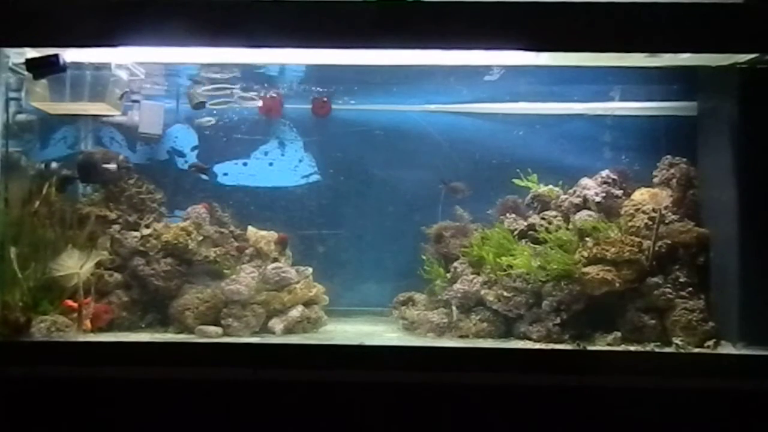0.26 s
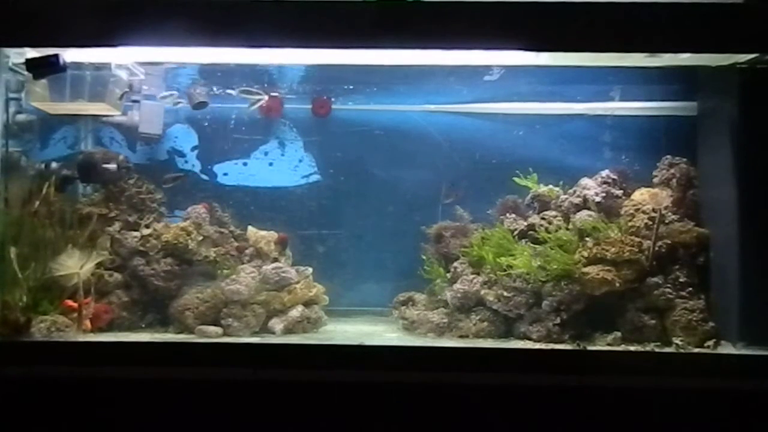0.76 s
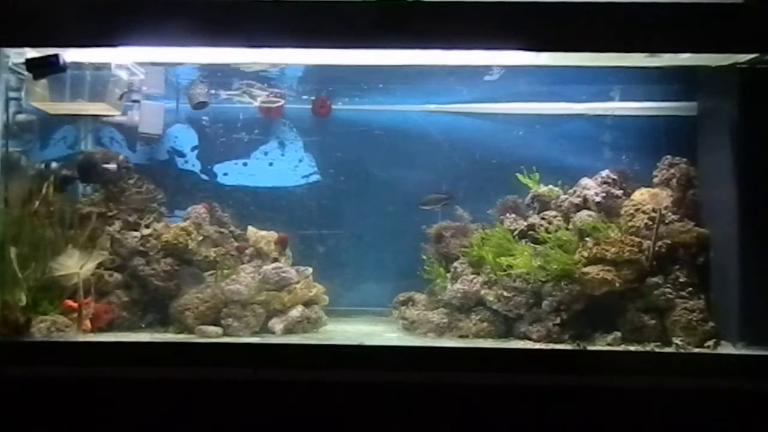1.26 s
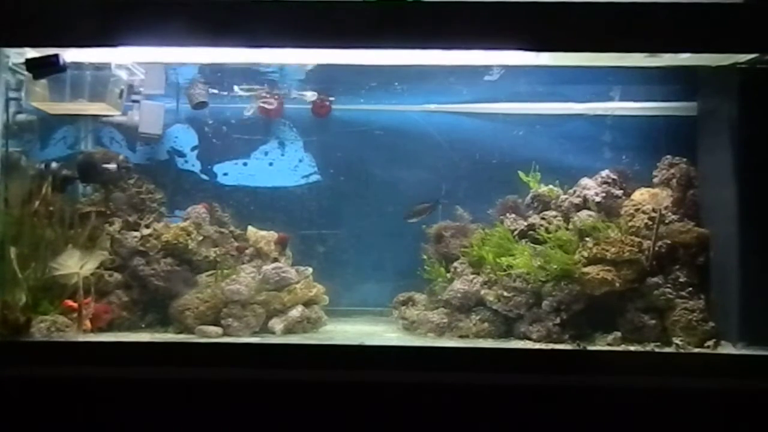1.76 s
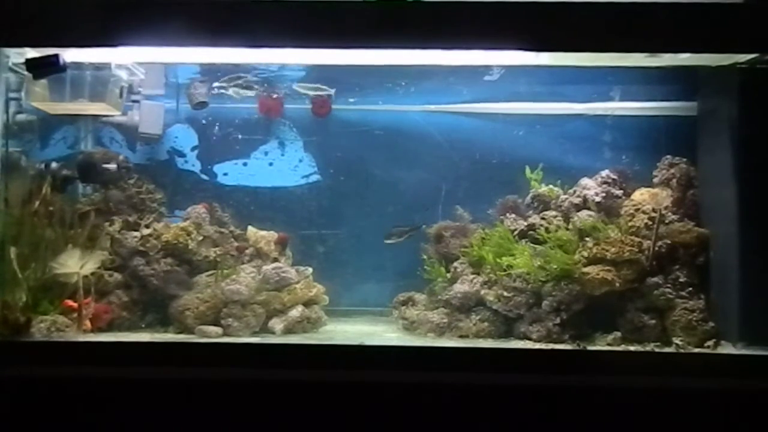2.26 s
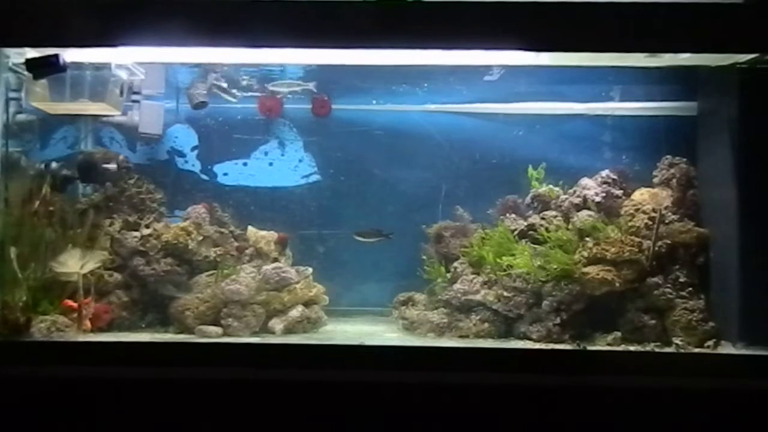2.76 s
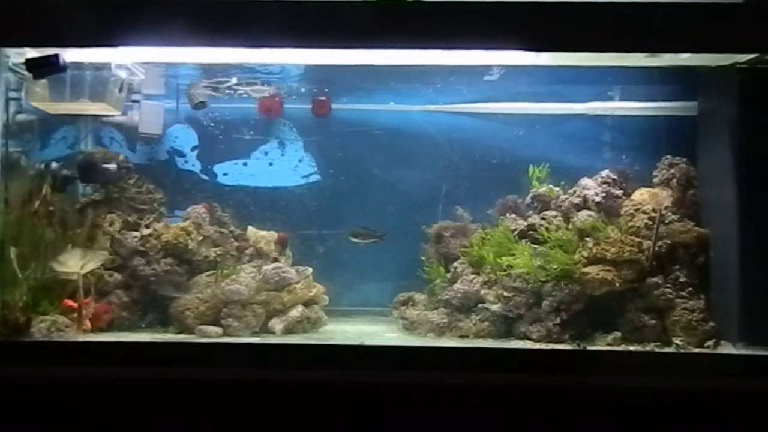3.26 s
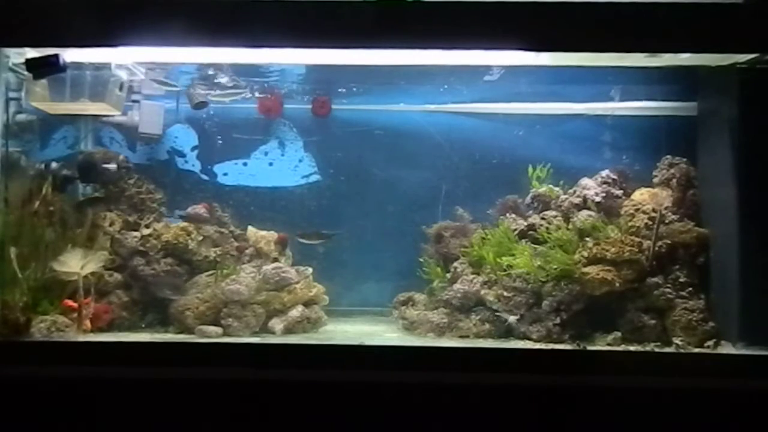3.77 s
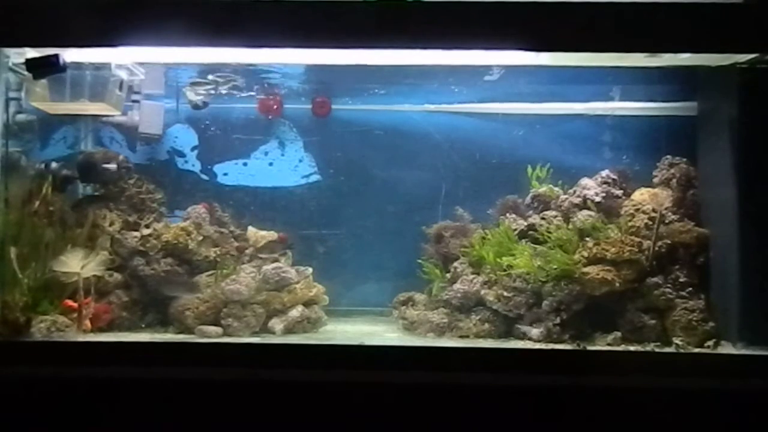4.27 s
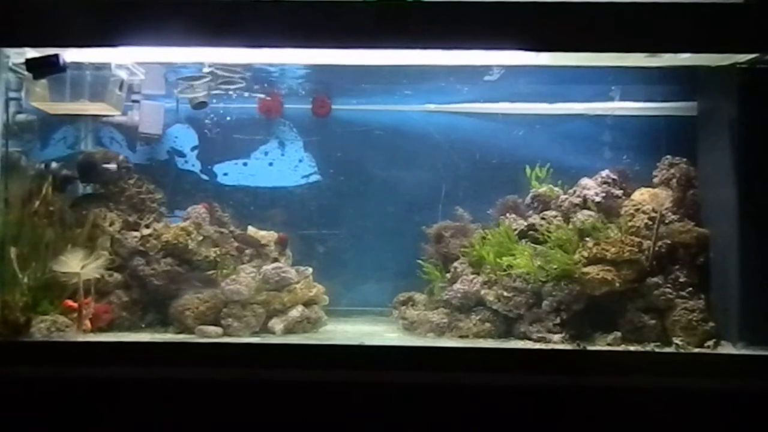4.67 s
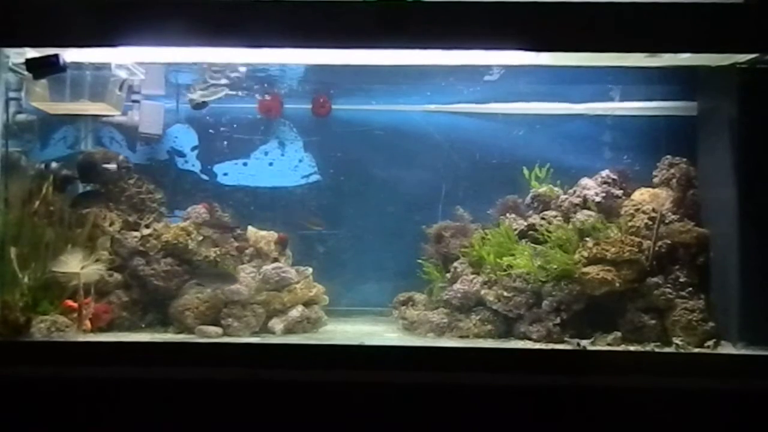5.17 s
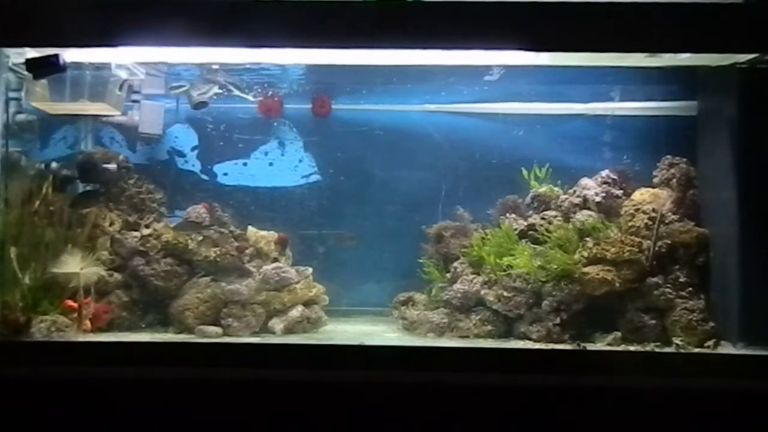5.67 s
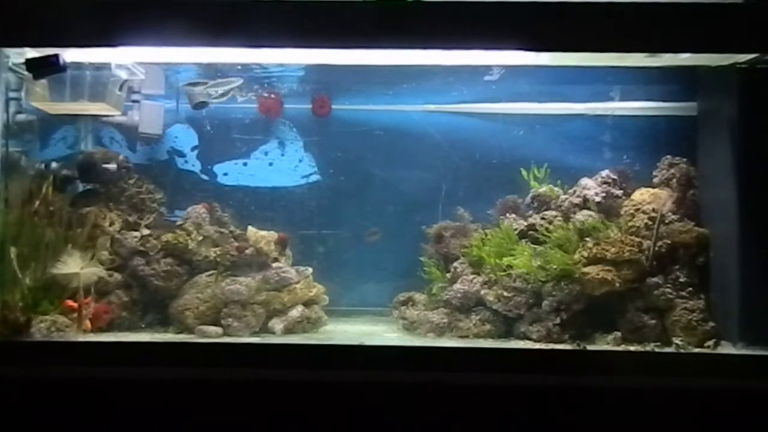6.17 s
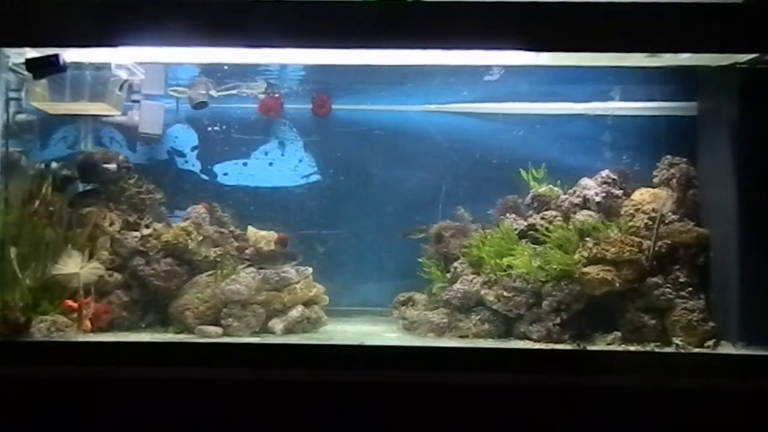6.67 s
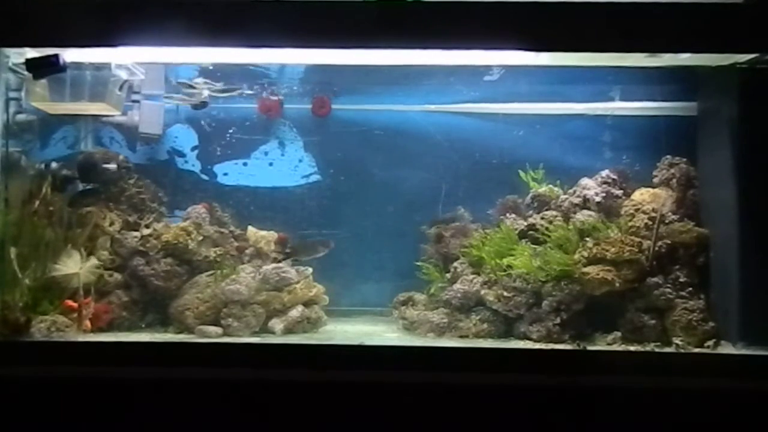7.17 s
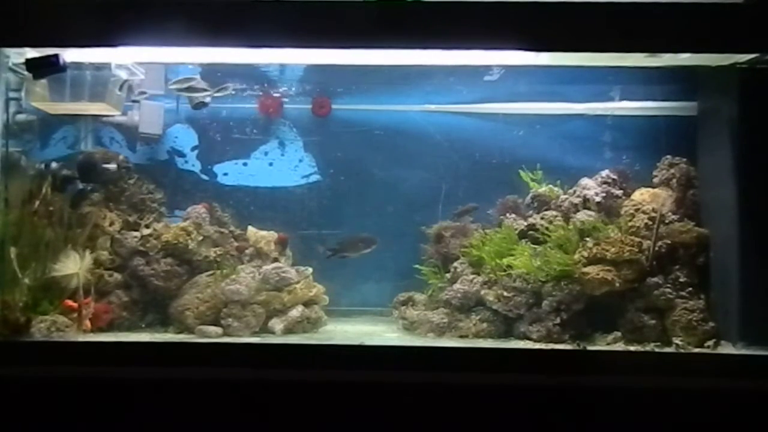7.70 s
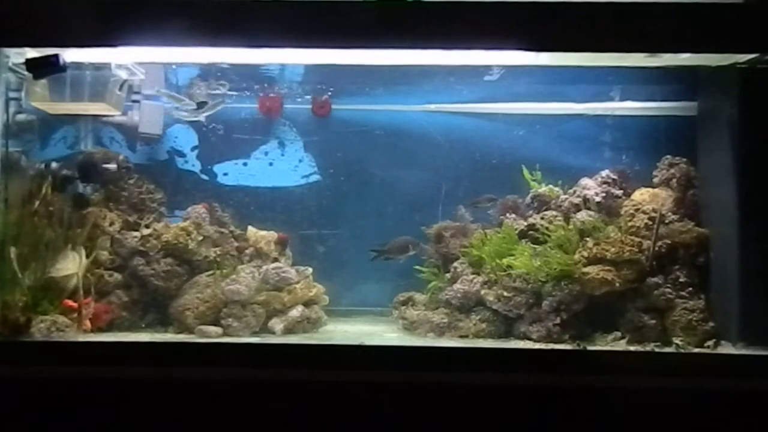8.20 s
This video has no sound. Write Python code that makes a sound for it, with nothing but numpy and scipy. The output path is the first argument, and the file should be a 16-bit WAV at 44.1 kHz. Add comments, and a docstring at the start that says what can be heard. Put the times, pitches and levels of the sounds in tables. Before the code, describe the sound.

A constant deep electrical drone dominates, with a quiet metallic purr from the spinning impeller and gentle hiss of outlet water. Its upper hum thickens after the first couple of seconds. Small bright clicks and brief squeaky scrapes appear irregularly. After almost seven seconds a rougher, mid-pitched grinding begins with a momentary howl and pulses until the end. Indoor stereo pickup, low sound slightly stronger on the left, little obvious echo.

```python
"""A mains-driven aquarium pump hums through glass and cabinet in a quiet room, low tones leaning left.
Its impeller ticks unevenly through each turn and rings the housing; now and then it knocks or scrapes.
Coloured noise makes the rush of water at the outlet, and many short pings make its fizz.
Near the end the impeller catches with a brief howl and goes on rasping with a faint whine.
The microphones hear each noise source as direct sound plus a diffuse part that differs left and right."""
import sys
import numpy as np
from scipy import signal
from scipy.fft import rfft, irfft
from scipy.io import wavfile

SR = 44100
rng = np.random.default_rng(int(sys.argv[2]) if len(sys.argv) > 2 else 0)


def put_to_file(sound):
    """Save the sound as 16-bit audio at rate SR, in the file named by the first command-line argument."""
    columns = np.atleast_2d(sound).T  # one column per channel
    safe = np.clip(columns, -1, 1)
    whole_steps = np.round(safe * 32767)
    wavfile.write(sys.argv[1], SR, whole_steps.astype(np.int16))


N = 372204
TIME = np.arange(N) / SR  # s
FREQS = np.arange(N // 2 + 1) * SR / N + 1e-6  # Hz, kept above zero for the logarithms
MAINS_HZ = 50


def amp(db):
    """Decibels to gain."""
    return 10 ** (np.asarray(db) / 20)


def curve(rows):
    """Gain over time from (s, dB) points."""
    return amp(np.interp(TIME, *np.transpose(rows)))


def colour(points, hz=FREQS):
    """Gain over frequency from (Hz, dB) points, joined on a logarithmic frequency scale."""
    point_hz, db = np.transpose(points)
    return amp(np.interp(np.log(hz), np.log(point_hz), db))


def unit(x):
    """Scale to rms 1."""
    return x / np.sqrt(np.mean(x ** 2))


def walk(rate_hz):
    """Smooth random wandering with spread 1: noise with its fast part filtered off."""
    slowing = (1 + (FREQS / rate_hz) ** 2) ** 2
    return unit(irfft(rfft(rng.standard_normal(N)) / slowing, N))


def bump(peak_s, half_s):
    """A smooth swell from 0 to 1 and back."""
    return np.exp(-((TIME - peak_s) / half_s) ** 2)


def swells(rows):
    """Gain over time that rises or dips briefly for each (peak s, half length s, rise dB)."""
    return amp(sum(db * bump(at, half) for at, half, db in rows))


def settle(start_s, rise_s):
    """Rise from 0 towards 1, quickly at first and then ever more slowly."""
    return 1 - np.exp(-np.maximum(TIME - start_s, 0) / rise_s)


def resonance(hz, width_hz):
    """Response of one damped mode, gain 1 at its centre."""
    return 1 / (1 + 1j * (FREQS / hz - hz / FREQS) * hz / width_hz)


def modes(rows):
    """Several resonances together, each made steeper by a second one of twice the width."""
    return sum(amp(db) * resonance(hz, width) * np.abs(resonance(hz, 2 * width)) for hz, width, db in rows)


def tone(cycles, waver=0, waver_hz=5.1):
    """A sine of rms 1 whose size and phase waver at random."""
    wander = 1 + waver * (walk(waver_hz) + 1j * walk(waver_hz))
    wander = wander / np.sqrt(1 + 2 * waver ** 2)
    return np.sqrt(2) * np.real(wander * np.exp(2j * np.pi * cycles))


def rotor_tone(hz, turns, waver, waver_hz):
    """A wavering tone on the multiple of half the rotor rate nearest to hz, from a random phase."""
    cycles_per_turn = round(2 * hz / MAINS_HZ) / 2
    return tone(cycles_per_turn * turns + rng.random(), waver, waver_hz)


# Diffuse room sound against direct sound at the microphones.
# Each row: frequency in Hz, level in dB.
DIFFUSE_ROOM = [(40, -20.5), (130, -15.5), (260, -3), (500, -5), (1000, -11), (2000, -6.5), (4000, -5),
                (8000, -4.5), (12000, -0.5)]


def radiate(pair, response):
    """Colour direct and diffuse noise (response in gain per root Hz); the diffuse part is opposite left and right."""
    direct, diffuse = rfft(pair) * response * np.sqrt(SR / 2)
    diffuse = diffuse * colour(DIFFUSE_ROOM)
    return irfft(np.array([direct + diffuse, direct - diffuse]), N)


def reflections(near_s=.002, far_s=.024, echo_db=-13, count=9):
    """Echoes from glass and walls comb the sound into narrow peaks and dips; mean power gain 1."""
    lags = near_s + (far_s - near_s) * (np.arange(count) + rng.random(count)) / count
    echoes = np.zeros(N)
    echoes[0] = 1
    echoes[np.maximum(lags * SR, 1).astype(int)] = amp(echo_db) * rng.choice([-1, 1], count)
    return rfft(echoes) / np.sqrt(np.sum(echoes ** 2))


# Moving water at the outlet, before it flickers.
# Each row: frequency in Hz, level in dB per Hz.
WATER_COLOUR = [(25, -99), (62, -77.5), (112, -72), (133, -68.5), (145, -73.5), (180, -73), (250, -76.5),
                (310, -80), (680, -80.5), (950, -80.5), (1200, -80), (2300, -86), (4400, -94), (7800, -100),
                (10500, -100), (14000, -109), (15700, -109.5)]


def water(flicker_db=0.4):
    """The outflow rushes softly as coloured noise; every octave flickers on its own."""
    count = 9
    octaves = np.clip(np.log2(FREQS / MAINS_HZ), 0, count - 1)
    flow = rfft(radiate(rng.standard_normal((2, N)), colour(WATER_COLOUR) * reflections(echo_db=-17)))
    out = np.zeros((2, N))
    for k in range(count):
        band = irfft(flow * np.maximum(1 - np.abs(octaves - k), 0), N)
        out += band * amp(flicker_db * walk(8.4))
    return out


# Swells and dips shared by the fizz and the spray of the ticks.
# Each row: peak in seconds, half length in seconds, rise in dB before the whole is scaled to rms 1.
FLOW_SWELLS = [(.3, 0.5, 1), (1.45, 0.17, -1), (1.9, 0.3, 1), (2.5, .1, 1), (3.2, 0.15, 2.5),
               (3.38, 0.081, -1), (3.65, 0.12, 1), (4.35, 0.26, -2), (5.02, 0.2, 1.6), (5.55, 0.1, 1),
               (6.4, 0.15, 2), (6.92, .06, 2.5), (7.22, 0.07, 3.5), (7.52, 0.07, 3.5), (8.1, 0.2, 3.5),
               (8.38, 0.049, 3.5)]
FLOW_WANDER_DB, FLOW_WANDER_HZ = 1.16, 8


def flow_strength():
    """Gain of rms 1 that swells and dips at set moments and wanders at random."""
    return unit(swells(FLOW_SWELLS) * amp(FLOW_WANDER_DB * walk(FLOW_WANDER_HZ)))


def fizz(rate=130, cycles=4.7, fizz_db=-66.5, low_hz=4500, high_hz=12500):
    """Tiny bubbles burst at the surface (rate per second), each a short ping; higher ones are weaker."""
    out = np.zeros((2, N + 256))
    t = np.arange(256) / SR
    # the two sides of each ping start at their own random phases
    for when, pitch, size, left, right in rng.random((int(rate * N / SR), 5)):
        hz = low_hz + (high_hz - low_hz) * pitch
        decay = np.exp(-t * hz / cycles)
        ping = size ** 3 / hz * decay * np.sin(2 * np.pi * (hz * t + np.array([[left], [right]])))
        start = int(when * N)
        out[:, start:start + len(t)] += ping
    return amp(fizz_db) * unit(out[:, :N])


# Harder contacts inside the pump.
# Each row: start in seconds, level at the start in dB.
HARD_CONTACTS = [(1.58, -47), (2.12, -43), (3.43, -45), (3.61, -46), (3.91, -44), (4.55, -48), (5.41, -44),
                 (7.289, -46), (7.429, -47), (7.67, -44), (8.39, -47)]
KNOCK_DECAY_S, KNOCK_HZ, KNOCK_WIDTH_HZ = 0.00077, 7000, 6500


def knocks():
    """Now and then a contact lands harder: a short, bright tick of noise that stands out of the fizz."""
    force = sum(amp(db) * (TIME >= at) * (1 - settle(at, KNOCK_DECAY_S)) for at, db in HARD_CONTACTS)
    return force * unit(radiate(rng.standard_normal((2, N)), resonance(KNOCK_HZ, KNOCK_WIDTH_HZ) ** 2))


def chatter(turns, repeat, renew_hz=1.24, count=3):
    """Contact noise: a share (repeat, 0-1) recurs every second turn, in a pattern that slowly changes."""
    size = int(2 * SR / MAINS_HZ)  # samples in two turns
    place = np.round(turns / 2 * size).astype(int) % size
    weights = np.array([walk(renew_hz) for _ in range(count)])
    weights = weights / np.sqrt(np.sum(weights ** 2, axis=0))
    loop = sum(weight * rng.standard_normal((2, size))[:, place] for weight in weights)
    return np.sqrt(repeat) * loop + np.sqrt(1 - repeat) * rng.standard_normal((2, N))


# Thin scrapes of the impeller.
# Each row: start in seconds, end in seconds, build-up in seconds, level in dB per Hz before the seat.
SCRAPE_TIMES = [(-.1, .075, .05, -76), (1.3, 1.52, .06, -83), (1.65, 2.1, 0.16, -83),
                (2.18, 2.46, 0.065, -85), (3.242, 3.384, 0.022, -84.5), (6.28, 6.677, 0.26, -77.5)]
SCRAPE_RELEASE_S = 0.022
# Resonances of the impeller's seat.
# Each row: frequency in Hz, width in Hz before steepening, gain in dB.
SEAT_MODES = [(2540, 60, -8), (2680, 154, 0.5), (3080, 480, -5.5)]


def scrape(turns):
    """The impeller grazes its seat now and then: a thin, high scrape builds up and breaks off."""
    strength = np.zeros(N)
    for start, end, build, db in SCRAPE_TIMES:
        rise = np.clip((TIME - start) / build, 0, 1)
        strength += amp(db) * rise * (1 - settle(end, SCRAPE_RELEASE_S))
    return strength * radiate(chatter(turns, repeat=0.35), modes(SEAT_MODES))


# Colour of the impeller's rasp.
# Each row: frequency in Hz, level in dB per Hz before the rub gain and the pressure.
RUB_COLOUR = [(700, -100), (1000, -80), (1250, -81.5), (1600, -76.5), (1900, -80.5), (2080, -77.5),
              (2280, -76.5), (2480, -91), (3500, -94), (6000, -130)]
# The rasp presses harder or eases off.
# Each row: peak in seconds, half length in seconds, rise in dB.
PRESSURE_SURGES = [(6.88, .04, 1), (7.0, 0.042, 3), (7.2, .05, 0), (7.34, 0.064, 3), (7.56, 0.05, -0.5),
                   (7.7, 0.065, 2.2), (7.85, .07, -1.5), (8.16, 0.06, 2.5), (8.33, .08, 0)]
# Whine of the rubbing impeller.
# Each row: frequency in Hz, put on the nearest multiple of half the mains rate, level in dB before the whine gain.
WHINE_TONES = [(1100, -61), (1200, -55), (1250, -64), (1275, -66), (1375, -66), (1475, -69), (1825, -62),
               (2050, -63), (2150, -62), (2250, -69)]
RASP_START_S, RASP_ATTACK_S, RUB_DB = 6.73, 0.13, -0.1
HOWL_DB, HOWL_HZ, HOWL_WIDTH_HZ = -72, 1530, 560  # level in dB per Hz before the pressure
HOWL_HOLD_S, HOWL_FALL_DB_PER_S = 0.3, 40
WHINE_DB, WHINE_RISE_S = 4, 0.08


def rasp(turns):
    """The impeller catches and rubs all round its seat: lasting rasp and faint whine, with a howl that dies away."""
    age = TIME - RASP_START_S
    pressure = np.clip(age / RASP_ATTACK_S, 0, 1) * swells(PRESSURE_SURGES) * amp(0.99 * walk(14))
    rub = amp(RUB_DB) * radiate(chatter(turns, repeat=0.37, renew_hz=3.2), colour(RUB_COLOUR))
    howl_db = HOWL_DB - HOWL_FALL_DB_PER_S * np.maximum(age - HOWL_HOLD_S, 0)
    howl = amp(howl_db) * radiate(chatter(turns, repeat=0.092), resonance(HOWL_HZ, HOWL_WIDTH_HZ) ** 2)
    whine = sum(amp(db) * rotor_tone(hz, turns, waver=0.3, waver_hz=10) for hz, db in WHINE_TONES)
    return pressure * (rub + howl) + amp(WHINE_DB) * settle(RASP_START_S, WHINE_RISE_S) * whine


# Impeller contacts in one turn.
# Each row: place in the turn from 0 to 1, width in turns, strength in dB against the other contacts.
TURN_CONTACTS = [(.06, 0.045, -10.5), (.19, .04, -7), (.31, 0.041, -5), (.41, 0.048, -5.5), (.67, .04, -10),
                 (.83, .055, -2.5), (.95, 0.082, -11.5)]


def contacts(turns):
    """Force of the impeller on its seat through each turn, rms 1; the contacts add in power."""
    power = np.zeros(N)
    for at, width, db in TURN_CONTACTS:
        distance = (turns - at + .5) % 1 - .5
        power += amp(db) ** 2 * np.exp(-.5 * (distance / width) ** 2)
    return unit(np.sqrt(power))


# Resonances of the pump housing.
# Each row: frequency in Hz, width in Hz before steepening, level in dB per Hz.
HOUSING_MODES = [(781, 11, -78.5), (846, 51, -74), (895, 38, -70), (950, 39, -79), (1065, 63, -77.5),
                 (1248, 49, -77), (1447, 30, -82), (1673, 52, -78.5), (2030, 73, -84.5), (2743, 360, -85.5),
                 (3950, 230, -93.5), (4560, 270, -93.5), (5290, 140, -89.5), (5780, 130, -88.5),
                 (7230, 1100, -96.5), (8960, 900, -98)]
# Broad colour of the ticking.
# Each row: frequency in Hz, level in dB per Hz before the flow gain.
SPRAY_COLOUR = [(300, -100), (1000, -87), (3300, -91), (4400, -91), (6300, -100), (8000, -102),
                (10500, -102), (14000, -115)]


def impeller(turns, flow):
    """Uneven ticks ring the housing and spray a little broadband noise that follows the flow."""
    force = contacts(turns) * amp(1.14 * walk(80))
    ring = radiate(unit(force * chatter(turns, repeat=0.43, renew_hz=3.5)), modes(HOUSING_MODES))
    spray_response = colour(SPRAY_COLOUR) * reflections(echo_db=-9.0)
    spray = radiate(unit(force * chatter(turns, repeat=0.14)), spray_response)
    return ring + flow * spray


# How hard the cabinet buzzes with the weaker tones.
# Each row: time in seconds, strength in dB before the whole is scaled to rms 1.
CABINET_BUZZ = [(0, -5.5), (.95, 0.5), (1.2, -4), (1.9, -4), (2.5, -2.5), (2.8, 1.5), (3.7, .5), (4.4, 0),
                (5.0, 1), (5.6, 0.5), (6.4, -6.5), (7.2, -3), (7.5, -0.5), (8.44, 0)]
# Weaker pump tones, put on the nearest multiple of half the mains rate.
# Each row: frequency in Hz, level in dB before the common trim, dB gained per dB of cabinet buzz.
PUMP_OVERTONES = [(150, -58, -1), (225, -63, 0), (250, -69, 0), (300, -61, 0.5), (350, -59, 1.1),
                  (375, -63.5, 1.2), (400, -62, 2), (425, -67, 1), (450, -66.5, 0), (475, -74, -1),
                  (500, -65, -0.5), (550, -65.5, 1), (600, -68.5, 0.8), (650, -68.5, 1.5), (900, -60, 0),
                  (1075, -64, -0.7), (1200, -62.5, -.5), (1275, -68, 0.5), (1425, -72, -1),
                  (1702, -65.5, 0.6), (2060, -68, 0), (2550, -69, -1), (2740, -71, -1.5)]
# Two low, steady tones, perhaps other motors nearby.
# Each row: frequency in Hz, level in dB.
OTHER_MOTORS = [(40.6, -55.5), (53.1, -59)]
# the hum sags a little for each dB of cabinet buzz, while its octave follows the buzz
HUM_DB, HUM_SAG_PER_DB, OCTAVE_FOLLOW_PER_DB = -27.5, 0.0956, 0.5
# the octave is faint at first, then settles at a higher level
OCTAVE_FAINT_DB, OCTAVE_FULL_DB, OCTAVE_START_S, OCTAVE_RISE_S = -62.5, -49, 1.38, 0.7


def hum(turns, overtone_db=-0.8):
    """Magnetic pull shakes the tank twice a turn; its octave grows, with weaker tones and two low, steady ones."""
    buzz = unit(curve(CABINET_BUZZ))
    out = amp(HUM_DB) / buzz ** HUM_SAG_PER_DB * tone(2 * turns, waver=0.008)
    faint, full = amp(OCTAVE_FAINT_DB), amp(OCTAVE_FULL_DB)
    octave = faint + (full - faint) * settle(OCTAVE_START_S, OCTAVE_RISE_S)
    out += octave * buzz ** OCTAVE_FOLLOW_PER_DB * tone(4 * turns + rng.random(), waver=0.046)
    for hz, db, follow in PUMP_OVERTONES:
        out += amp(overtone_db + db) * buzz ** follow * rotor_tone(hz, turns, waver=0.49, waver_hz=5.4)
    for hz, db in OTHER_MOTORS:
        out += amp(db) * tone(hz * TIME + rng.random(), waver=0.015)
    return out


# Balance of the two microphone sides.
# Each row: frequency in Hz, left gain minus right gain in dB.
LEFT_LEAN = [(100, 3.8), (500, 3), (1000, 3), (2000, 1), (4000, -.3), (10000, 0.3)]


def place(sound):
    """Lean the low tones towards the pump on the left; the two gains always add up to 2."""
    lean = colour(LEFT_LEAN)
    return irfft(rfft(sound) * 2 * np.array([lean, np.ones_like(lean)]) / (1 + lean), N)


def scene():
    """All sources together, with the low tones leaning towards the pump on the left."""
    # the rotor is locked to the mains, which drifts very slightly
    turns = MAINS_HZ * TIME - .19 + .006 * walk(.7)
    flow = flow_strength()
    pump = hum(turns) + impeller(turns, flow) + scrape(turns) + rasp(turns)
    outlet = water() + flow * fizz()
    return place(pump + outlet + knocks())


TOP_HZ = 15720


def record(dry):
    """The camera cuts the top steeply."""
    low_pass = signal.ellip(14, .1, 80, TOP_HZ, fs=SR, output="sos")
    return signal.sosfilt(low_pass, dry)


dry = scene()
out = record(dry)
put_to_file(out)
```